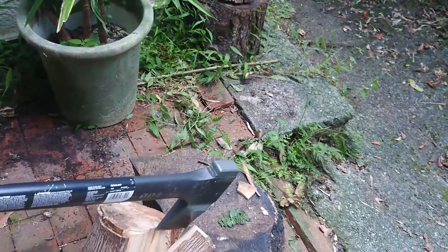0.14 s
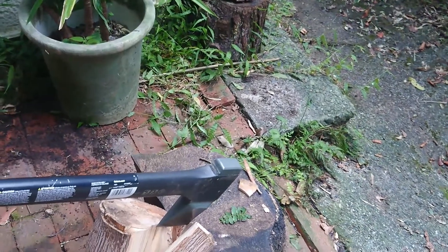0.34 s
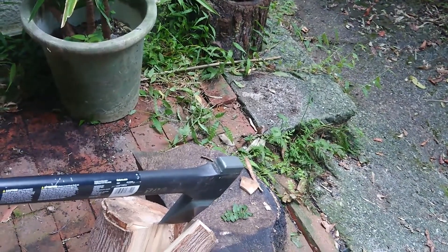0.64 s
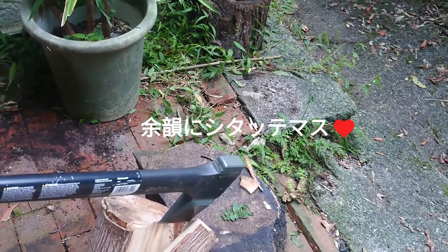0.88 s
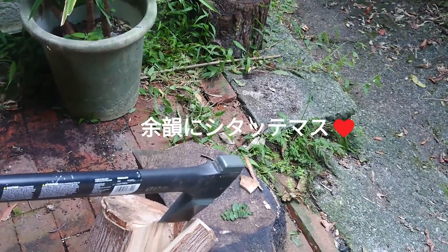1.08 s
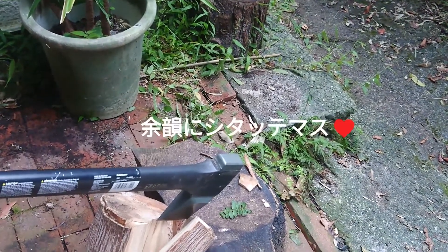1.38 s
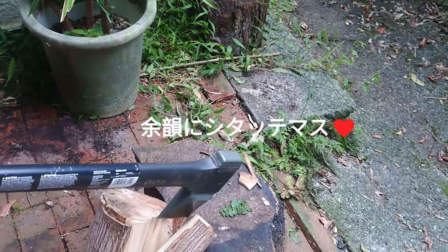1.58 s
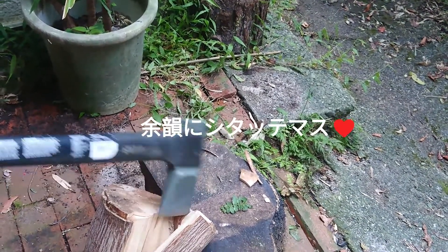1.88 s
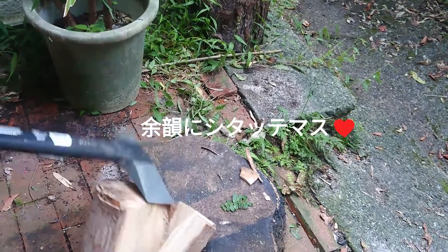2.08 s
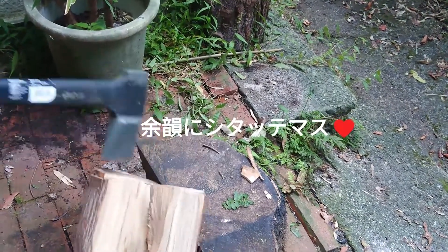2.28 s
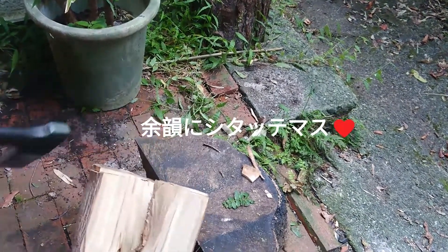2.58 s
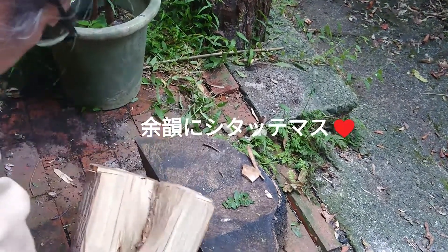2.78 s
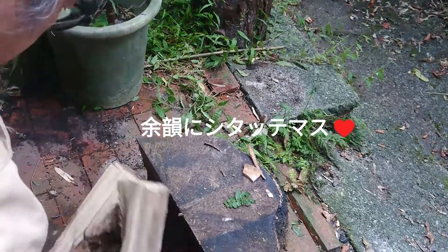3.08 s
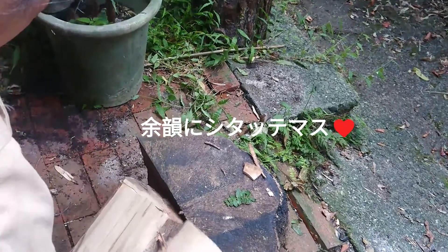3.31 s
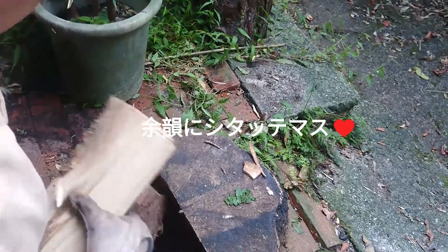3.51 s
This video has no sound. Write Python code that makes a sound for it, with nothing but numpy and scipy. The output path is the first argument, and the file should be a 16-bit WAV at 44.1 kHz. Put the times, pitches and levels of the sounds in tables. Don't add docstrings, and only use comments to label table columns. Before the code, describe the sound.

Close to the microphone, dry logs are levered, tipped and dropped with short woody knocks, snapping splinters and gritty scraping; before and behind lie soft distant town rumble, faint crickets and a rasping insect outdoors.

```python
import sys
import numpy as np
from scipy import signal
from scipy.fft import rfft, irfft, next_fast_len
from scipy.io import wavfile
from scipy.ndimage import uniform_filter1d

SR = 44100
rng = np.random.default_rng(int(sys.argv[2]) if len(sys.argv) > 2 else 0)


def elevation(decibels):
    levels = np.asarray(decibels, float)
    return 10 ** (levels / 20)


def unload_audio(sound):
    columns = np.transpose(np.atleast_2d(sound))
    steps = np.round(np.clip(columns, -1, 1) * 32767)
    wavfile.write(sys.argv[1], SR, steps.astype(np.int16))


N = 160965


def evened(x):
    return x / np.sqrt(np.mean(x ** 2) + 1e-20)


def read(points, hz):
    f, value = np.transpose(points)
    return np.interp(np.log(hz + 1), np.log(f + 1), value)


def add(mix, s, sound):
    part = mix[..., round(s * SR):][..., :sound.shape[-1]]
    part += sound[..., :part.shape[-1]]


def resonate(x, hz, width_hz):
    turn = np.exp(2j * np.pi * hz * np.arange(x.shape[-1]) / SR)
    r = np.exp(-np.pi * width_hz / SR)
    smooth = signal.lfilter([(1 - r) ** 2], [1, -2 * r, r * r], x / turn)
    return 2 * (turn * smooth).real


# [f/Hz, level/dB per Hz]
AIR_COLOUR = [(32, 2.5), (58, -2), (150, -3), (215, -16.5), (430, -16), (730, -16), (1000, -19.5),
              (1600, -25.5),
              (1700, -24.5), (2600, -26), (4000, -36), (5350, -37), (5600, -43.5), (7300, -48), (9300, -45),
            (12500, -59)]
# [f/Hz, correlation]
AIR_LIKENESS = [(60, 0.99), (240, 0.92), (950, 0.06), (3770, -0.21), (15000, 0.026)]
# [f/Hz, level/dB]
AIR_BALANCE = [(60, -3.5), (180, -0.5), (550, 2), (1650, -4), (4970, -10), (15000, 14)]
AIR_DB, PATCH_DB = -45, 0.94


def town_air():
    frames, hz = N // 256 + 5, np.fft.rfftfreq(1024, 1 / SR)
    a, b, c, d, patches = rng.standard_normal((frames, 513, 5)).T
    patches = uniform_filter1d(patches, size=10, axis=0)
    patches = evened(uniform_filter1d(patches, size=12, axis=1))
    same = np.clip(read(AIR_LIKENESS, hz), -1, 1)[:, None]
    left = a + 1j * b
    right = same * left + np.sqrt(1 - same ** 2) * (c + 1j * d)
    colour_db = read(AIR_COLOUR + [(13200, -57), (14500, -84)], hz)[:, None]
    balance_db = np.outer([.5, -.5], read(AIR_BALANCE, hz))[..., None]
    spectra = np.array([left, right]) * elevation(colour_db + PATCH_DB * patches + balance_db)
    return elevation(AIR_DB) * evened(signal.istft(spectra, nperseg=1024, noverlap=768)[1][:, :N])


FAR_HZ, FAR_WIDTH_HZ, FAR_DB = 4894, 170, -72.5
FAR_PER_S, FAR_FIRST_S = 16.93, .028


def far_cricket():
    phase = 2 * np.pi * FAR_PER_S * (np.arange(N) / SR - FAR_FIRST_S)
    throb = (0.95 + 0.33 * np.cos(phase) + 0.25 * np.cos(2 * phase)).clip(0)
    song = evened(resonate(rng.standard_normal((2, N)), FAR_HZ, FAR_WIDTH_HZ))
    return elevation(FAR_DB) * throb * song * elevation([[-2.5], [2.5]])


# [t/s, length/s, level/dB, f/Hz]
RASPS = [
    (0.146, 0.29, -58, 4100),
    (1.075, 0.29, -58, 4100),
    (1.418, 0.19, -67.5, 4600),
    (3.304, 0.25, -58, 4170),
]
RASP_WIDTH_HZ, RASP_PER_S = 450, 84


def rasping_insect():
    t, out = np.arange(SR // 2) / SR, np.zeros((2, N))
    for s, length, db, hz in RASPS:
        swell = np.sin(np.pi * np.clip(t / length, 0, 1)) ** 0.56
        flutter = 1 + 0.18 * np.cos(2 * np.pi * RASP_PER_S * t)
        rasp = evened(resonate(rng.standard_normal((2, len(t))), hz, RASP_WIDTH_HZ))
        add(out, s, elevation(db) * swell * flutter * rasp * elevation([[1.5], [-1.5]]))
    return out


# [t/s, length/s, level/dB, f/Hz at the ends, f/Hz at mid-note]
BIRD_NOTES = [
    (1.058, 0.064, -62, 3380, 3500),
    (1.13, 0.03, -64, 3460, 3450),
]


def bird():
    out = np.zeros((2, N))
    for s, length, db, end_hz, middle_hz in BIRD_NOTES:
        u = np.arange(0, 1, 1 / SR / length)
        arch = np.sin(np.pi * u)
        whistle = np.sin(2 * np.pi * np.cumsum(end_hz + (middle_hz - end_hz) * arch) / SR)
        add(out, s, elevation(db) * arch ** 0.59 * whistle * elevation([[1.5], [-1.5]]))
    return out


# [t/s, strokes so far]
CRICKET_PACE = [(.458, 0), (.663, 6), (1.203, 21), (1.964, 42), (2.945, 69)]
# [t/s, level/dB]
CRICKET_LEVEL = [(.45, -81), (.8, -77.5), (1.2, -74), (2.75, -70), (2.95, -67)]
CRICKET_TOP_HZ, CRICKET_FALL_HZ, CRICKET_CHIRP_S = 6950, 800, .027
CRICKET_ECHO_S, CRICKET_ECHO_DB = 0.004, -2
TEETH, TEETH_SPAN = .4, 220


def near_cricket():
    s, strokes = np.transpose(CRICKET_PACE)
    t = np.arange(N) / SR
    stroke_s = (s[-1] - s[0]) / strokes[-1]
    u = np.interp(t, s, strokes) % 1 * stroke_s / CRICKET_CHIRP_S
    tone = np.sin(2 * np.pi * np.cumsum(CRICKET_TOP_HZ - CRICKET_FALL_HZ * np.minimum(u, 1)) / SR)
    teeth = 1 + TEETH * evened(uniform_filter1d(rng.standard_normal((2, N)), size=TEETH_SPAN, axis=1))
    level_db = np.interp(t, *np.transpose(CRICKET_LEVEL)) + np.array([[-1.5], [1.5]])
    swell = np.sin(np.pi * np.clip(u, 0, 1) ** 1.8)
    call = elevation(level_db) * swell * tone * teeth
    return call + elevation(CRICKET_ECHO_DB) * np.roll(call[::-1], round(CRICKET_ECHO_S * SR), axis=1)


# [f/Hz, level/dB]
DRY_WOOD = [(400, -14), (1500, -17.5), (3100, -16), (4600, -9.5), (7000, -23), (8300, -22.5),
            (11300, -26.5), (13300, -36)]
# [t/s, length/s, level/dB, tilt/dB per octave, rattle f/Hz]
SCUFFS = [(1.725, 0.29, -52, -4, 2950), (1.985, 0.076, -43.5, -2.5, 3100), (2.051, 0.12, -38, -4, 2950),
          (2.084, 0.16, -40, -5.5, 2130), (2.152, 0.11, -41.5, -0.5, 3220), (2.212, 0.05, -47, 1, 2880),
          (2.25, 0.042, -38.5, 0.5, 2800), (2.281, 0.066, -38.5, -2, 2980), (2.402, 0.017, -43, -1.5, 1700),
          (2.588, 0.17, -55.5, -1.5, 2340), (2.773, 0.13, -40, -3, 2520), (2.808, 0.059, -37, 0.5, 2940),
          (2.925, 0.12, -40, -5, 1540), (3.01, 0.13, -46.5, 2.5, 2600), (3.057, 0.054, -35.5, -1, 3120),
          (3.088, 0.071, -38, -6.5, 3400), (3.151, 0.17, -50, -2.5, 2230), (3.21, 0.036, -40.5, -3.5, 1780),
          (3.258, 0.068, -35, -3.5, 3500), (3.391, 0.17, -46.5, -3.5, 2700),
          (3.426, 0.021, -36.5, -2.5, 2900), (3.465, 0.024, -40.5, 1, 3050), (3.554, 0.17, -47.5, -5, 2410)]
SCUFF_RISE, SCUFF_FADE_DB, SCUFF_SAME = 0.034, -18, 0.78
GRIT_PER_S, GRIT_DB, GRIT_CLUMP = 700, 3, 70
RATTLE_WIDTH_HZ, RATTLE_DB = 1910, -7.5


def scuffs():
    out, size = np.zeros((2, N)), 8192
    hz = np.fft.rfftfreq(size, 1 / SR)
    for s, length, db, tilt_db, rattle_hz in SCUFFS:
        draw = rng.random((5, size))
        u = np.arange(size) / SR / length
        grains = (draw[3] < GRIT_PER_S / SR) * elevation(-GRIT_DB * np.log(draw[4] + 0.012))
        clumps = uniform_filter1d(uniform_filter1d(grains, size=GRIT_CLUMP), size=GRIT_CLUMP)
        hiss = SCUFF_SAME * (draw[0] - .5) + (1 - SCUFF_SAME) * 2 * (draw[1:3] - .5)
        colour = elevation(read(DRY_WOOD, hz) + tilt_db * np.log2((hz + 50) / 3000))
        grit = evened(irfft(rfft(hiss * (0.54 + evened(clumps))) * colour))
        grit = grit + elevation(RATTLE_DB) * evened(resonate(grit, rattle_hz, RATTLE_WIDTH_HZ))
        add(out, s, elevation(db + SCUFF_FADE_DB * u ** 1.28) * np.minimum(u / SCUFF_RISE, 1) * grit)
    return out


# [t/s, level/dB, ring f/Hz, snap level/dB]
TICKS = [(1.9863, -38, 3340, -29), (1.997, -39, 2980, -28), (2.058, -40.5, 3250, -12),
         (2.1566, -32.5, 1436, -23), (2.1657, -25, 2870, -42), (2.174, -30, 3450, -26),
         (2.1796, -20, 3700, -31), (2.1829, -22.5, 3120, -35), (2.189, -28, 3150, -26),
         (2.197, -28, 3470, -26), (2.214, -41, 2380, -20), (2.2536, -25.5, 2730, -21.5),
         (2.2585, -43, 2820, -20), (2.286, -46, 4070, -27), (2.2893, -23, 3380, -38),
         (2.3032, -30, 2610, -27), (2.312, -42, 2800, -12), (2.321, -45, 2660, -15),
         (2.4042, -50, 1530, -33), (2.4986, -49.5, 2480, -7.5), (2.6248, -42.5, 2270, -22),
         (2.772, -43.5, 1420, -11), (2.781, -44, 2520, -10), (2.8024, -34.5, 2520, -9.5),
         (2.8155, -42, 2560, -19), (2.818, -35, 2860, -29), (2.826, -32, 2970, -16),
         (2.8332, -25.5, 2730, -20), (2.87, -45, 1680, -9), (2.9528, -45.5, 1540, -11),
         (3.0133, -25, 4550, -13), (3.016, -21.5, 2890, -37), (3.017, -40, 2500, -32),
         (3.0579, -26, 3780, -21), (3.0645, -14.5, 3520, -22.5), (3.0655, -26, 2390, -28),
         (3.071, -40, 2930, -23), (3.083, -38, 3260, -22), (3.092, -26, 3720, -23), (3.101, -32, 3200, -23),
         (3.1646, -52, 1960, -8), (3.185, -46, 3210, -12), (3.2116, -37.5, 1670, -16),
         (3.258, -26, 2540, -8), (3.2644, -25, 3020, -14), (3.412, -45, 2820, -22),
         (3.4289, -31.5, 2800, -24), (3.4694, -34, 2960, -20), (3.4705, -32, 6460, -24),
         (3.5664, -48.5, 2680, -13)]
SNAP_DB, SNAP_T60_S, TICK_RISE_S = 10, 0.013, .0009
RING_SPREAD, RING_CYCLES = 0.204, 30


def splinter_ticks():
    t, out = np.arange(2048) / SR, np.zeros(N)
    colour = elevation(read(DRY_WOOD, np.fft.rfftfreq(2048, 1 / SR)))
    rise = np.minimum(t / TICK_RISE_S, 1) ** 2
    for s, db, hz, snap_db in TICKS:
        draw = rng.standard_normal(2048)
        ring = 0
        for k in (0, *draw[:6]):
            ring = ring + np.sin(2 * np.pi * hz * np.exp(RING_SPREAD * k) * t + 9 * k) / (1 + abs(k))
        ring = ring * elevation(-60 * t * hz / RING_CYCLES)
        puff = evened(irfft(rfft(np.diff(draw, prepend=0)) * colour))
        snap = elevation(SNAP_DB + snap_db - 60 * t / SNAP_T60_S) * puff
        add(out, s - .001, elevation(db) * rise * (ring + snap))
    return out


# [t/s, peak level/dB, contact/ms]
LEVERED_BLOWS = [
    (2.0595, -32.5, 1),
    (2.0710, -9, 0.61),
    (2.0732, -18.5, 0.7),
    (2.0765, -30, 0.72),
    (2.0845, -25.5, 0.73),
    (2.0895, -32, 0.91),
]
TIPPED_BLOWS = [
    (2.352, -34, 6.1),
    (2.520, -35.5, 6),
    (2.620, -39.5, 4.9),
    (2.685, -32.5, 3.2),
    (2.7785, -32.5, 1.4),
    (2.8075, -36, 0.66),
    (2.8173, -16.5, 1.93),
    (2.8315, -26, 1.5),
    (2.8425, -21, 7.5),
]
DROPPED_BLOWS = [
    (3.2619, -5.5, 2.4),
    (3.2815, -24, 2.2),
]
# [f/Hz, level/dB, t60/s]
LEVERED_MODES = [(199, 3, 0.041), (339, -0.5, 0.04), (249, 0, 0.048), (495, 3, 0.019), (656, -1, 0.022),
                 (864, -4.5, 0.016), (1076, -1.5, 0.027), (1160, -18, 0.032), (1497, -3, 0.026),
                 (1880, -5, 0.014), (2040, -2, 0.0085), (2536, 2, 0.021), (2930, 3.5, 0.011),
                 (3500, 7, 0.019)]
TIPPED_MODES = [(103, 4, 0.078), (154, 1, 0.13), (264, 11, 0.026), (415, -3, 0.028), (526, -9, 0.025),
                (618, -4, 0.033), (705, -6, 0.046), (1083, 0.5, 0.036), (1490, -21, .03)]
DROPPED_MODES = [(115, -27, 0.14), (181, 2.5, 0.13), (210, 2, 0.071), (263, 5, 0.082), (352, -1, 0.097),
                 (407, 12, 0.025), (433, -4.5, 0.13), (495, -2, 0.084), (560, -2, 0.045),
                 (680, -1.5, 0.035), (745, 0.5, 0.043), (796, 5.5, 0.032), (950, -4, 0.067),
                 (1158, 19.5, 0.033)]
CRACK_T60_S, CRACK_WIDTH_HZ = 0.03, 3800
SWELL = 1.13


def knocked_log(blows, modes, crack_db, crack_hz):
    t, out = np.arange(SR // 4) / SR, np.zeros(N)
    ring = sum(elevation(db - 60 * t / t60) * np.sin(2 * np.pi * hz * t) for hz, db, t60 in modes)
    for s, db, contact_ms in blows:
        u = t * 1000 / contact_ms
        push = (np.sin(np.pi * u) * np.sin(2 * np.pi * u) * (u < 1))[:600]
        knock = np.convolve(ring, push)[:len(t)] * np.minimum(u / SWELL, 1)
        fibres = resonate(rng.standard_normal(len(t)), crack_hz, CRACK_WIDTH_HZ)
        fibres = evened(resonate(fibres, crack_hz, CRACK_WIDTH_HZ))
        crack = elevation(crack_db - 60 * t / CRACK_T60_S) * fibres * np.minimum(u, 1)
        add(out, s, elevation(db) * (knock / abs(knock).max() + crack))
    return out


# [f/Hz, level/dB]
NEAR_BALANCE = [(60, -4), (150, -3), (380, 3.5), (950, 1), (2600, -9), (5500, -5), (8500, 6.5),
                (13000, -5.5)]
NEAR_LAG_S, ECHO_DB, ECHO_T60_S = -.00012, -6.5, .06


def ports(x):
    length = SR // 8
    t, taps = np.arange(length) / SR, np.zeros((2, length))
    at = np.arange(60, length - 20, 20) + rng.integers(0, 20, (2, (length - 61) // 20))
    np.put_along_axis(taps, at, rng.choice([-1., 1.], at.shape), 1)
    taps *= elevation(-60 * t / ECHO_T60_S)
    size = next_fast_len(N + SR // 4)
    hz, side = np.fft.rfftfreq(size, 1 / SR), np.array([[.5], [-.5]])
    no_bass = hz ** 2 / (hz ** 2 + 1500 ** 2)
    echo = elevation(ECHO_DB) * rfft(taps / np.linalg.norm(taps[0]), size) * no_bass
    direct = np.exp(-2j * np.pi * hz * side * NEAR_LAG_S)
    path = elevation(side * read(NEAR_BALANCE, hz)) * (direct + echo)
    return irfft(rfft(x, size) * path, size)[:, :N]


def scene():
    behind = town_air() + far_cricket() + rasping_insect() + bird() + near_cricket()
    levered = knocked_log(LEVERED_BLOWS, LEVERED_MODES, -11.5, 1580)
    tipped = knocked_log(TIPPED_BLOWS, TIPPED_MODES, -14.0, 1600)
    dropped = knocked_log(DROPPED_BLOWS, DROPPED_MODES, -18.5, 1930)
    wood = dropped - levered - tipped + splinter_ticks() + scuffs()
    return behind + ports(wood)


def low_pass(x):
    return signal.sosfilt(signal.butter(12, 16780, fs=SR, output="sos"), x)


def record(dry):
    band = signal.butter(4, [52, 15000], "bandpass", fs=SR, output="sos")
    rumble_cut = signal.butter(2, 42, "highpass", fs=SR, output="sos")
    mix = signal.sosfilt(np.vstack([band, rumble_cut]), dry)
    return low_pass(mix)


dry = scene()
out = record(dry)
unload_audio(out)
```